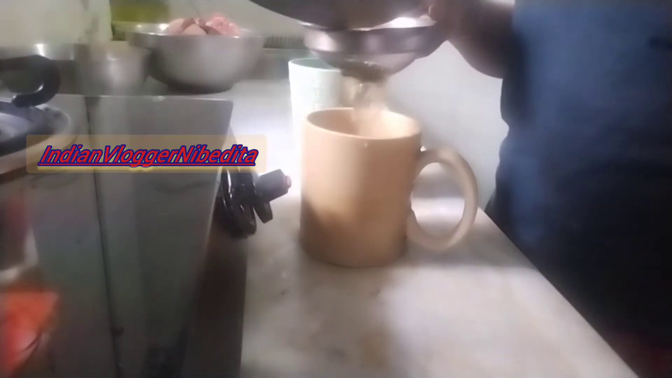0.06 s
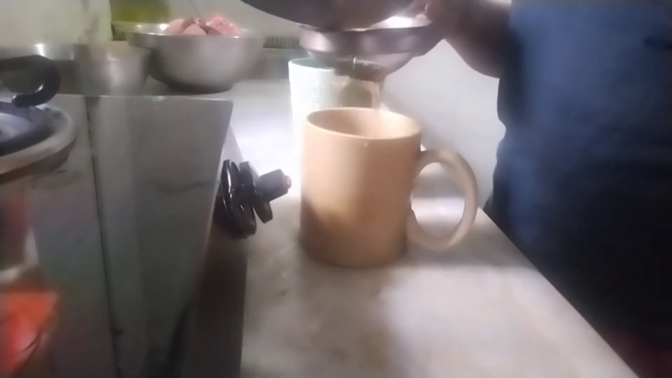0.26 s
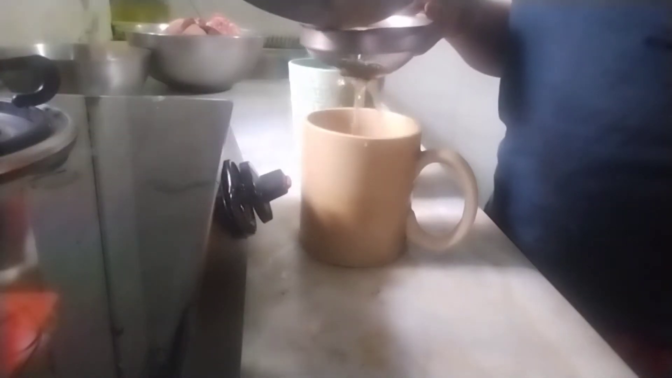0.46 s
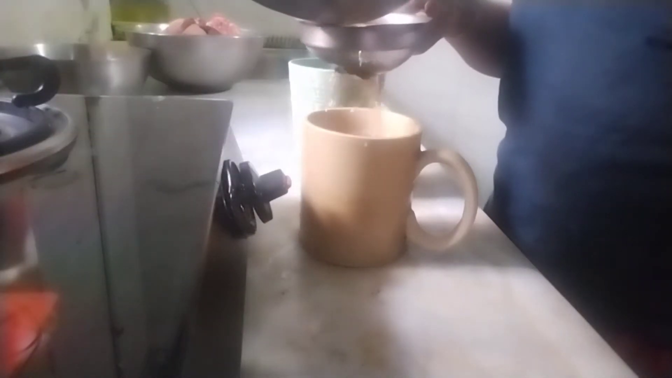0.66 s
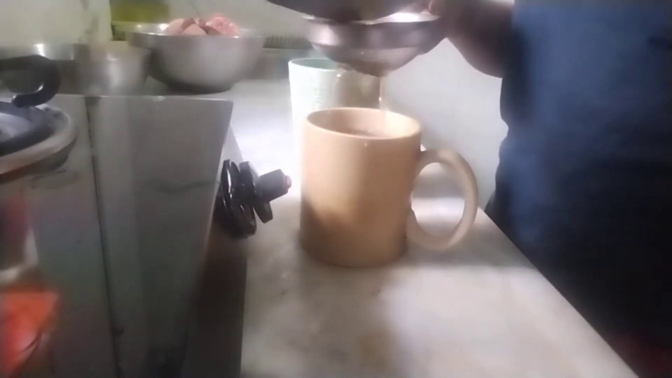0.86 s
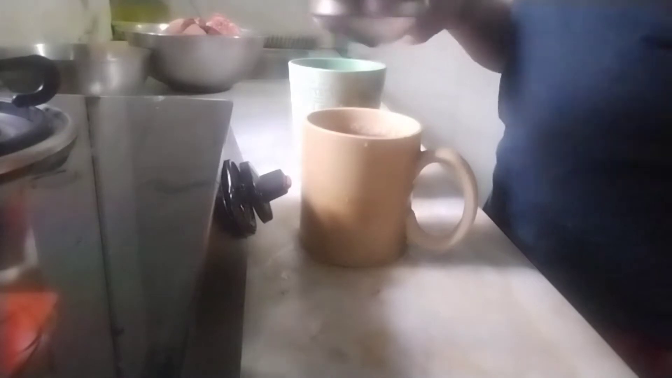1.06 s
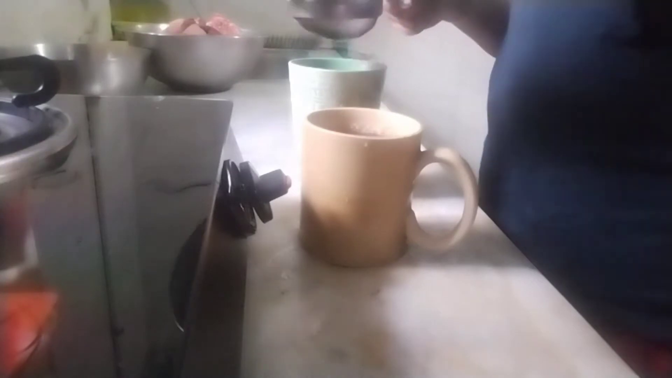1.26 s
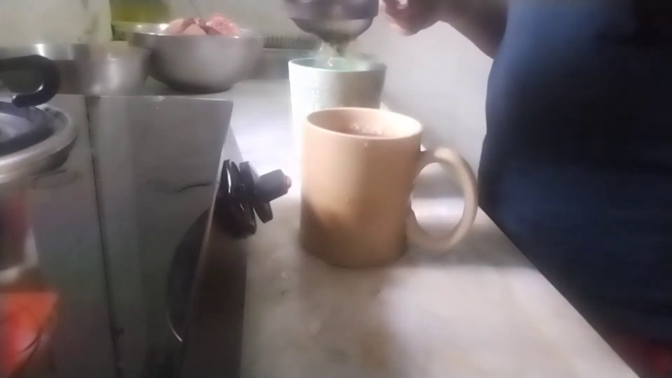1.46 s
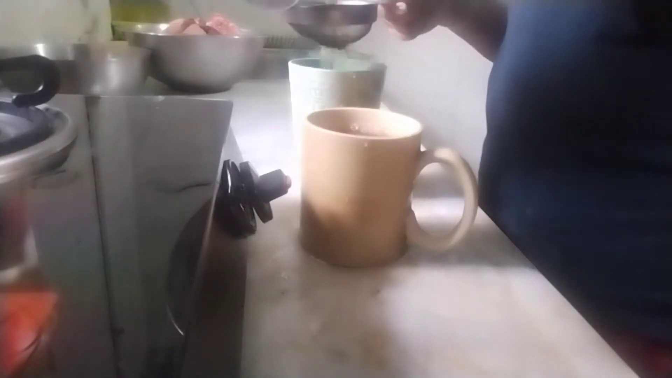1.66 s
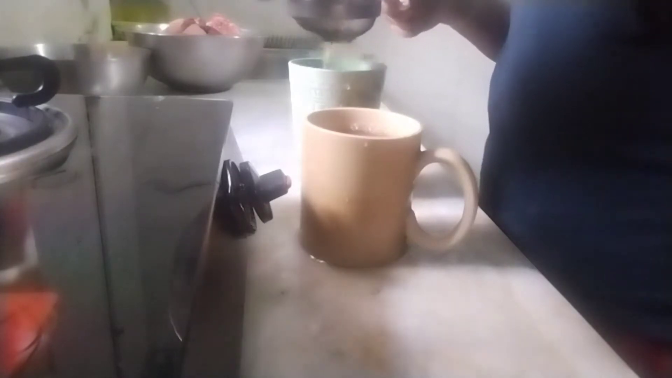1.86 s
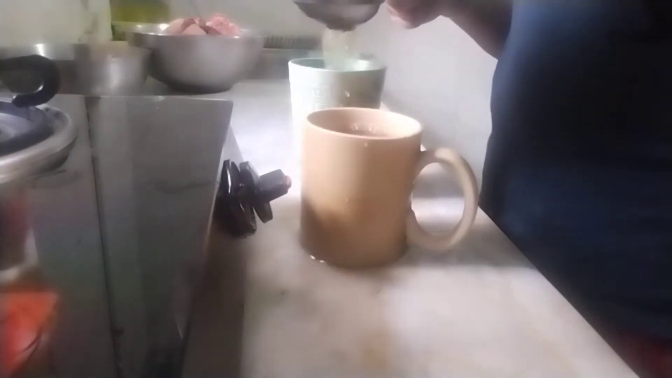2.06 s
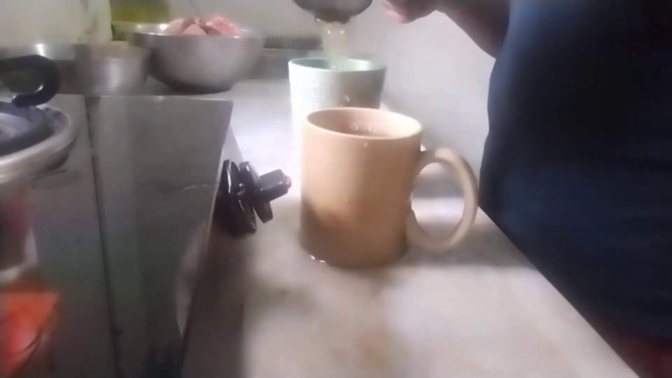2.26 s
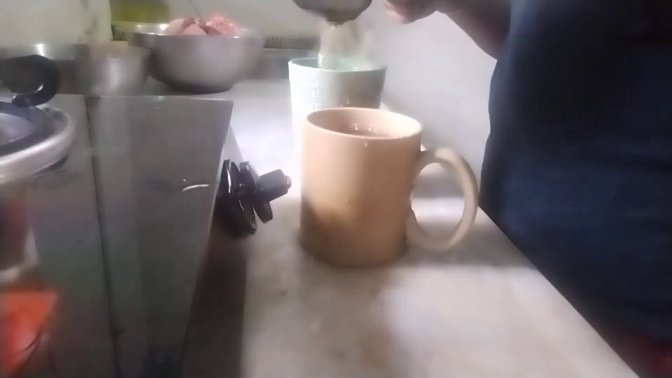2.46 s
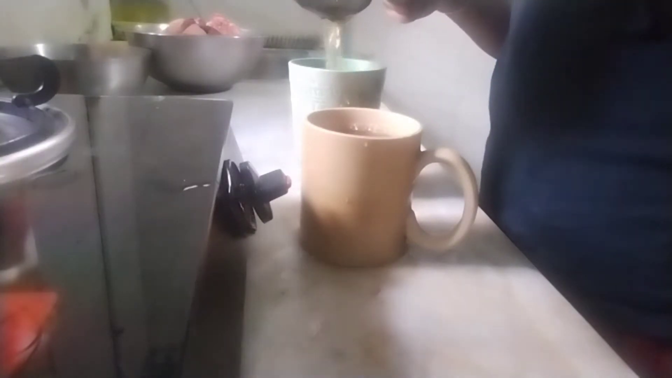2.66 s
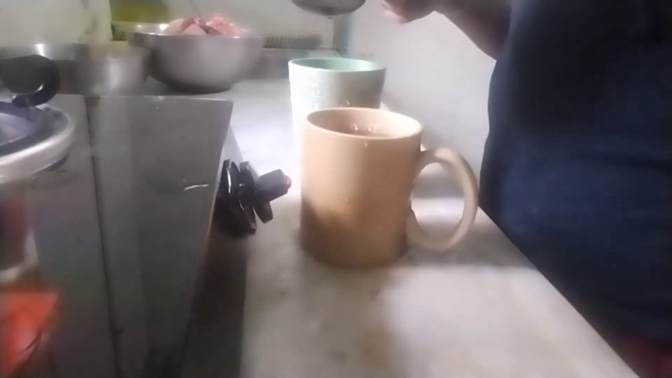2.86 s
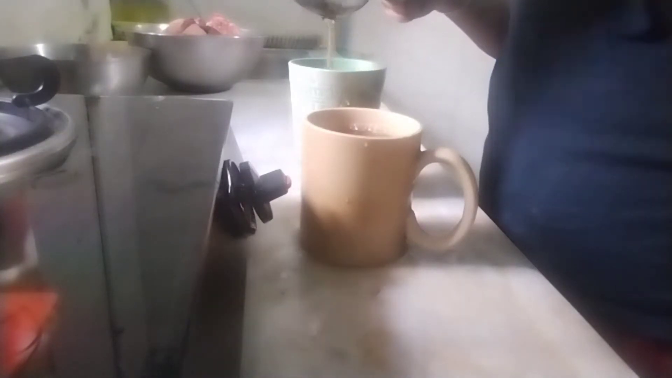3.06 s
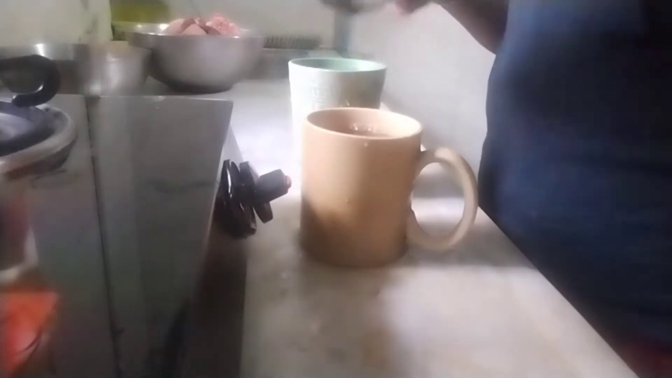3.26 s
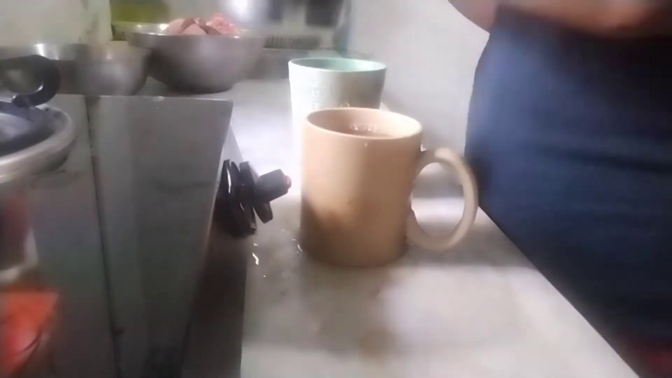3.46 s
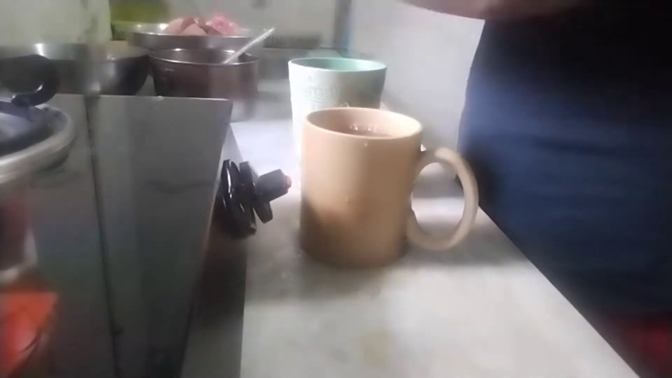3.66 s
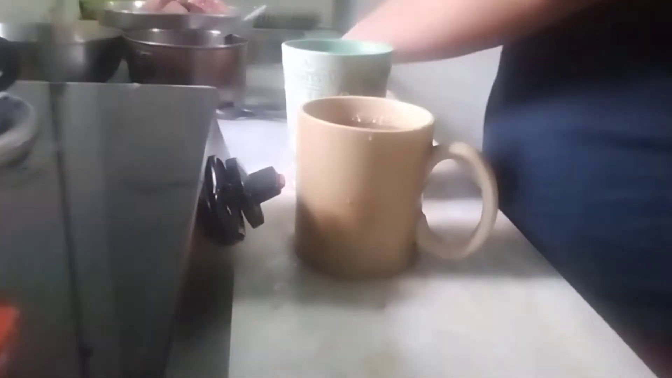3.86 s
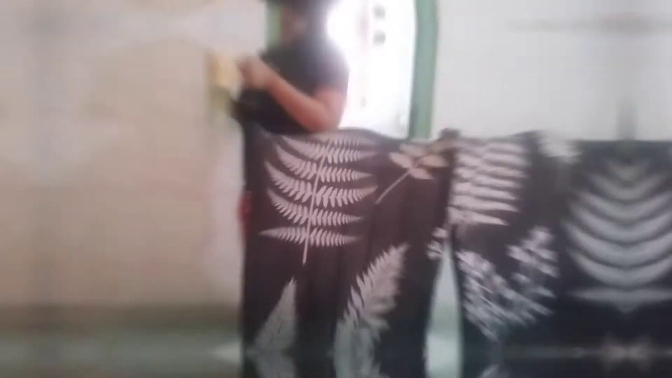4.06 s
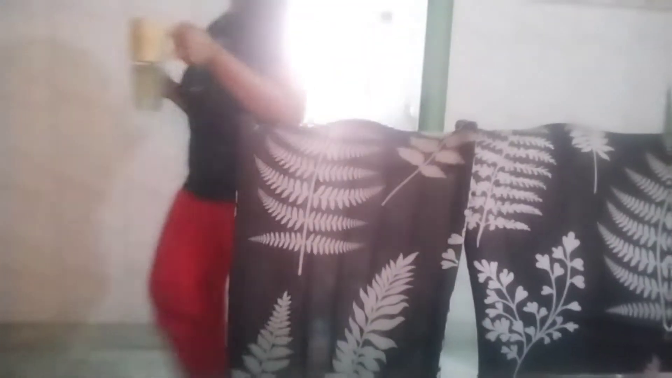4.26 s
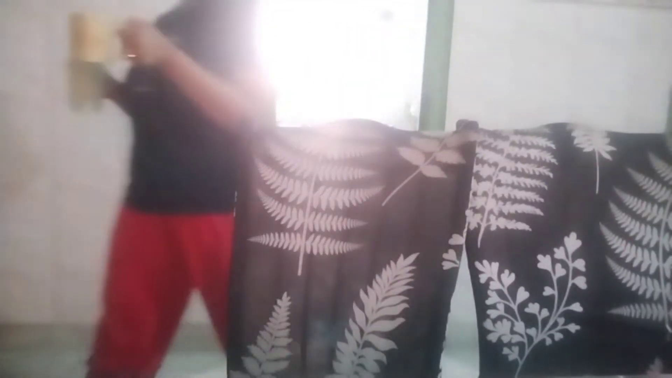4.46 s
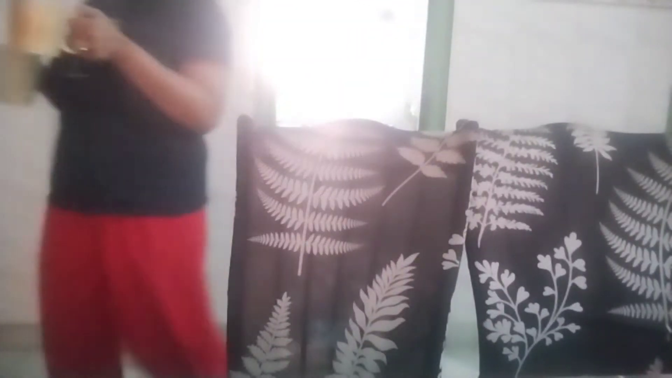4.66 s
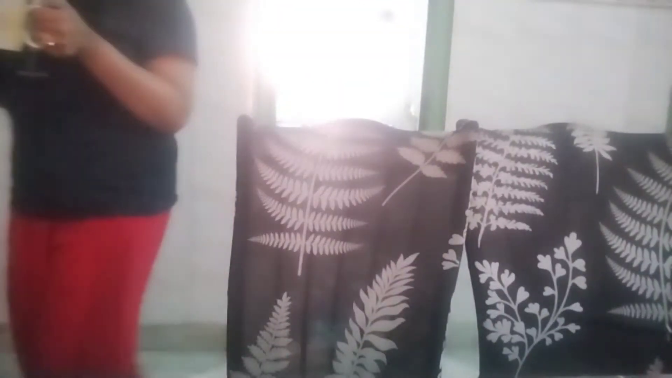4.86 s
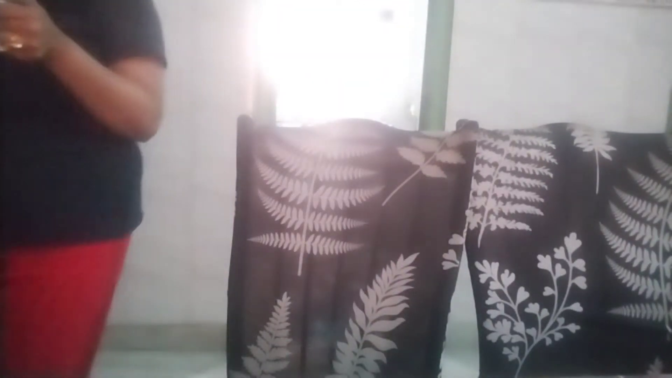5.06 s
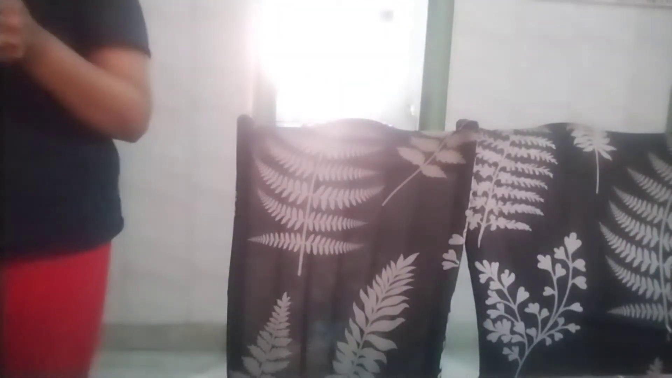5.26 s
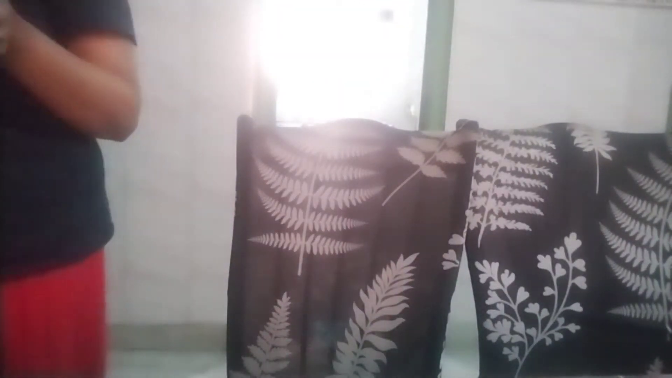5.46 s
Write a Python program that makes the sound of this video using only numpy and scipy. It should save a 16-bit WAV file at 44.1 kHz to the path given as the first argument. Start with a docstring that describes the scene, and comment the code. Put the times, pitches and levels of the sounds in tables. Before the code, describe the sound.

In a quiet kitchen, close to the microphone, tea trickles in quick surges into a mug, thins to drips, and a utensil lightly brushes ceramic. A second mug fills with hollow plops and spatter, slowing to drops. A metal pan lands with a heavy clunk, the strainer rattles after it, then the sound gives way to another room's soft hush with tiny squeaks.

```python
"""Tea strained into two mugs

Tea runs through a steel strainer into one ceramic mug, then a second, on a stone kitchen counter.
Crowds of small bubbles make gurgle and spatter, single bubbles the plops, narrow-band noise the ringing air.
The pan is set down with a rattle, the strainer dropped after it: decaying modes plus streaked noise.
The kitchen then fades away; the fuller hush of another room comes up, with a rustle and faint squeaks."""
import sys
import numpy as np
from scipy import signal
from scipy.fft import rfft, irfft
from scipy.io import wavfile
from scipy.ndimage import uniform_filter1d

SR = 44100
rng = np.random.default_rng(int(sys.argv[2]) if len(sys.argv) > 2 else 0)


def wav_out(sig):
    """Save sig, one row per channel (or a flat mono array), as 16-bit PCM at SR to the path in sys.argv[1]."""
    wavfile.write(sys.argv[1], SR, np.round(np.clip(np.atleast_2d(sig).T, -1, 1) * 32767).astype(np.int16))


N = 242991
TIME = np.arange(N) / SR  # s
TOP_HZ = 15850
# one pour per mug: start/s, ebb start/s, ebb rate/(dB/s), gurgle/dB, spatter/dB, surge depth/0-1
POURS = [(-0.73, 0.58, 50, -55.5, -63, 0.8), (1.368, 2.095, 20, -54, -56.5, 0.7)]
POUR_END_S, SURGE_S = 3.35, 0.15
HOLLOW_HZ = 965  # air column of the nearly empty second mug
STRAY_HIGH_HZ = 4200  # also caps the satellites of all drops


def undb(db):
    """Decibels to gain."""
    return 10 ** (np.asarray(db) / 20)


def unit(x):
    """Scale to rms 1."""
    return x / np.sqrt(np.mean(x ** 2) + 1e-18)


def curve(rows):
    """Interpolate (s, value) rows at every sample."""
    return np.interp(TIME, *np.transpose(rows))


def ramp(start_s, length_s):
    """A straight rise from 0 to 1."""
    return np.clip((TIME - start_s) / length_s, 0, 1)


def swell(centre_s, length_s):
    """One half-sine rise and fall."""
    return np.sin(np.pi * ramp(centre_s - length_s / 2, length_s))


def add(out, start_s, sound):
    """Mix a sound in at its start time, or at 0 if that is earlier."""
    i = max(int(start_s * SR), 0)
    out[i:i + len(sound)] += sound[:max(N - i, 0)]


def colour(x, spectrum):
    """Minimum-phase filter through (Hz, dB) points; the result has rms 1."""
    hz, db = np.transpose(spectrum)
    size = 4096
    grid = np.maximum(np.arange(size // 2 + 1) * SR / size, 1)
    log_gain = np.log(undb(np.interp(np.log(grid), np.log(hz), db)))
    # folding the cepstrum makes the filter causal
    cepstrum = irfft(log_gain)
    cepstrum[1:size // 2] *= 2
    cepstrum[size // 2 + 1:] = 0
    impulse = irfft(np.exp(rfft(cepstrum)))
    return unit(signal.fftconvolve(x, impulse)[:len(x)])


def walk(rate_per_s, size=N):
    """Random levels, each held 1 / rate, smoothed twice over that time; rms 1."""
    k = int(SR / rate_per_s)
    steps = np.repeat(rng.standard_normal(size // k + 1), k)
    return unit(uniform_filter1d(uniform_filter1d(steps, k), k)[:size])


def steady(x, span_s):
    """Even out the loudness over the span, keeping the finer grain."""
    k = int(span_s * SR)
    power = uniform_filter1d(uniform_filter1d(x ** 2, k), k)
    return x / np.sqrt(np.abs(power) + 1e-9)


def resonance(hz, width_hz, size=N):
    """A resonance kept ringing by random pushes; rms 1."""
    phase = 2 * np.pi * np.cumsum(hz * np.ones(size)) / SR
    return unit(walk(width_hz, size=size) * np.sin(phase) + walk(width_hz, size=size) * np.cos(phase))


def stream():
    """Surging pours and short spurts set how hard the tea gurgles and spatters."""
    # spurts that spatter: centre t/s, length/s, peak level/dB
    spurt_rows = [(0.25, 0.03, -55), (0.49, .08, -53), (0.645, .05, -60), (0.8, 0.08, -60),
                  (1.578, .05, -48), (1.71, 0.03, -52), (2.985, 0.04, -62)]
    pool_s, empty_gurgle_db = 0.6, -14.5  # the gurgle starts weak and gains strength over pool_s
    churn = np.zeros(N)
    splash = sum(undb(db) * swell(s, length) for s, length, db in spurt_rows)
    for start, ebb, ebb_rate, gurgle_db, spatter_db, depth in POURS:
        strength = flow(start, ebb, ebb_rate) * surges(start, depth)
        churn += strength * undb(gurgle_db + empty_gurgle_db * (1 - ramp(start, pool_s)))
        splash += strength * undb(spatter_db)
    return churn * gurgle() + splash * spatter(ticks_per_s=500, tick_db=-9, spread_db=4.0)


def flow(start_s, ebb_s, ebb_db_per_s):
    """Strength of one pour, 0-1: it builds up, holds, ebbs away and stops as the pan runs dry."""
    attack_s, dry_s = 0.22, 2.6
    ebb = undb(-ebb_db_per_s * np.maximum(TIME - ebb_s, 0))
    return ramp(start_s, attack_s) * ebb * (1 - ramp(dry_s, attack_s))


def surges(start_s, depth):
    """Tea leaves the pan in regular surges, 0-1, that rise faster than they fall."""
    phase = (TIME - start_s) / SURGE_S % 1
    skew = 0.7
    return 1 - min(depth, 1) * (1 - np.sin(np.pi * phase ** skew))


def running():
    """Summed strength of the pours, with their surges."""
    return sum(flow(start, ebb, ebb_rate) * surges(start, depth) for start, ebb, ebb_rate, _, _, depth in POURS)


def gurgle():
    """Bubbles churn where the stream enters the tea."""
    # colour of the churn: f/Hz, level/dB
    gurgle_spectrum = [(200, -27), (450, -13), (800, -5), (1200, 0), (1600, -1), (1950, -17), (2800, -26)]
    bubbles = crowd(hz=1100, per_s=950, scatter_octaves=1, cycles=3, spread_db=2.8, span_s=0.035)
    return colour(bubbles, gurgle_spectrum)


def spatter(ticks_per_s, tick_db, spread_db):
    """Tiny bubbles crackle in the splash; droplets tick against the mug wall."""
    crackle = crowd(hz=3600, per_s=1400, scatter_octaves=1.1, cycles=4.5, spread_db=2.8, span_s=0.035)
    hits = rng.random(N) < ticks_per_s / SR
    ticks = hits * undb(spread_db * rng.exponential(size=N)) * rng.choice([-1, 1], N)
    return in_mugs(crackle + undb(tick_db) * steady(ticks, 0.051))


def in_mugs(x):
    """Colour a splash by the mug in use; each half is taken from a filtered whole of rms 1."""
    # colour of the splash in each mug: f/Hz, level/dB
    first_spectrum = [(1200, -17), (1750, -4), (2300, -3), (3000, -2), (4000, 4.5), (4900, -12),
                      (6000, -9.5), (8200, -15.5), (9400, -32.5), (16000, -21)]
    second_spectrum = [(1200, -21.5), (2050, -12), (2700, -1), (3200, -7), (3800, 4), (4700, -8),
                       (5800, -8), (7000, -7), (8100, -7), (9400, -31), (16000, -33)]
    change_s = 1.2
    return np.where(TIME < change_s, colour(x, first_spectrum), colour(x, second_spectrum))


def crowd(hz, per_s, scatter_octaves, cycles, spread_db, span_s):
    """Many small bubbles of scattered size, a few much louder than the rest."""
    out = np.zeros(N)
    for when, size, life, pick in rng.random((int(per_s * POUR_END_S), 4)):
        pitch = min(hz * 2 ** (scatter_octaves * (2 * pick - 1)), SR / 3)
        gain = undb(-spread_db * np.log(1 - size))
        add(out, when * POUR_END_S, gain * bubble(pitch, cycles * (0.5 + life) / pitch, 0.01, 1))
    return steady(out, span_s)


def bubble(hz, peak_s, glide, roundness):
    """A trapped bubble swells to its peak, dies away and rises in pitch as it nears the surface."""
    t = np.arange(int(peak_s * (2 + 10 / roundness) * SR) + 2) / SR
    age = t / peak_s
    tone = np.sin(2 * np.pi * hz * t * (1 + glide * age / 2))
    return tone * (age * np.exp(1 - age)) ** roundness


def peak_time(hz):
    """Time in s in which a bubble of this pitch swells; smaller ones are quicker."""
    return 0.0031 * (1000 / hz) ** 0.55


def glugs(scatter_octaves, spread_db, glide, count):
    """Each glug is a quick run of bubbles of nearly one size."""
    # runs: centre t/s, length/s, f/Hz, rms over the length/dB
    glug_rows = [(0.04, .09, 1450, -53), (0.205, .07, 850, -53), (0.465, .06, 650, -52),
                 (0.515, .08, 2250, -56), (0.54, .045, 1250, -48), (0.67, .07, 820, -50),
                 (0.765, .06, 1050, -55), (0.828, .025, 2400, -54), (1.12, .04, 1150, -59),
                 (1.41, .025, 3200, -59), (1.465, .045, 3950, -55), (1.546, .022, 2900, -44),
                 (1.688, .018, 2800, -42), (1.728, .02, 1300, -41), (2.088, .03, 500, -45),
                 (2.105, .07, 1300, -49), (2.45, .05, 2050, -58), (2.45, .16, 390, -59),
                 (3.045, .055, 1500, -56), (3.14, .06, 1400, -60), (3.152, .04, 380, -53)]
    out = np.zeros(N)
    for s, length, hz, db in glug_rows:
        run = np.zeros(N)
        for k, (late, pick, size) in enumerate(rng.random((count, 3))):
            place = (k + late) / count  # 0-1 along the run
            pitch = hz * 2 ** (scatter_octaves * (2 * pick - 1))
            gain = undb(spread_db * size) * np.sqrt(np.sin(np.pi * place))
            start_s = s + length * (place - 0.5) - peak_time(hz)
            add(run, start_s, gain * bubble(pitch, peak_time(pitch), glide, 2))
        out += undb(db) * run * np.sqrt(length * SR / np.sum(run ** 2))
    return out


def drops(glide, roundness, tick_db, tick_s, satellite_db, scatter_octaves, count):
    """Each drop ticks on the surface and leaves a short bubble note with smaller satellites."""
    # loudest drops, each trapping a bubble: t/s, f/Hz, peak level/dB
    drop_rows = [(0.032, 3720, -32), (0.037, 684, -37), (0.087, 688, -36.5), (0.116, 650, -36),
                 (0.298, 3260, -32), (0.336, 1576, -32.5), (0.381, 1460, -41), (0.566, 770, -34),
                 (0.775, 4250, -43), (1.246, 300, -46), (1.656, 656, -31), (1.677, 2810, -31),
                 (1.697, 663, -36), (1.838, 642, -34), (1.860, 562, -35), (1.919, 705, -37),
                 (1.948, 3810, -30), (1.965, 2850, -42), (1.987, 617, -36), (2.002, 3750, -34),
                 (2.024, 3690, -33), (2.031, 1250, -38), (2.069, 474, -37), (2.152, 3700, -38),
                 (2.194, 3660, -45), (2.261, 3840, -35), (2.310, 2190, -43), (2.355, 3980, -45),
                 (2.384, 2030, -47), (2.978, 729, -49), (3.175, 3850, -40)]
    out, splash = np.zeros(N), np.zeros(N)
    for s, hz, db in drop_rows + stray_drops():
        add(out, s, undb(db) * bubble(hz, peak_time(hz), glide, roundness))
        # small, fast drops tick harder than big, soft ones
        add(splash, s, undb(db + tick_db) * hz / 3500 * np.exp(-TIME[:1024] / tick_s))
        for late, size in rng.random((count, 2)):
            pitch = min(hz * 2 ** (scatter_octaves * size), STRAY_HIGH_HZ)
            satellite = bubble(pitch, peak_time(pitch) / 2, glide, 1)
            add(out, s + late * peak_time(hz), undb(db + satellite_db) * satellite)
    smack_ring, smack_spray = smacks()
    return out + smack_ring + (splash + smack_spray) * in_mugs(rng.standard_normal(N))


def stray_drops():
    """Lesser drops fall at random, weaker as the flow ebbs: rows of (s, pitch Hz, peak dB)."""
    per_s, full_flow_db, low_hz = 14, -49, 500
    db = full_flow_db + 20 * np.log10(running() + 1e-9)
    rows = []
    for when, pick in rng.random((int(per_s * POUR_END_S), 2)):
        s = when * POUR_END_S
        rows.append((s, low_hz * (STRAY_HIGH_HZ / low_hz) ** pick, db[int(s * SR)]))
    return rows


def smacks():
    """Drops smack on the mug wall and burst: a ringing noise band, and the envelope of their spray."""
    # smacks: t/s, centre f/Hz, level/dB
    smack_rows = [(0.033, 3700, -43), (0.289, 1950, -43), (0.337, 3300, -42), (1.565, 3900, -40),
                  (1.755, 4000, -43.5), (1.799, 4100, -45), (1.870, 3500, -33), (1.872, 2600, -38),
                  (2.263, 3900, -45), (2.330, 3900, -48), (2.502, 3300, -52), (2.966, 2300, -51)]
    width_hz, spray_db, peak_s = 1000, -9, 0.0013
    ring, spray_level = np.zeros(N), np.zeros(N)
    age = TIME[:4096] / peak_s
    for s, hz, db in smack_rows:
        burst = undb(db) * np.sqrt(age * np.exp(1 - age))
        add(ring, s, burst * steady(resonance(hz, width_hz, size=len(burst)), 0.004))
        add(spray_level, s, burst * undb(spray_db))
    return ring, spray_level


def hollow(width_hz, broken_db):
    """The stream rings the air column of the second mug; as the mug fills the note rises and breaks up."""
    covered_s, rise_hz_per_s = 1.76, 680  # the bottom is covered from here on
    open_db, damped_db, damp_s = -43, -12, 0.038
    start, ebb, ebb_rate, _, _, depth = POURS[1]
    covered = ramp(covered_s - damp_s, damp_s)
    hz = HOLLOW_HZ + rise_hz_per_s * np.maximum(TIME - covered_s, 0)
    db = open_db + covered * (damped_db + broken_db * walk(49.93))
    # only the full stream, from the second surge on, drives it with force
    drive = flow(start + SURGE_S, ebb, ebb_rate) ** 0.68 * flow(start, ebb, ebb_rate) ** 3
    drive = drive * surges(start, depth) ** covered
    return drive * undb(db) * steady(resonance(hz, width_hz), 0.041)


def knocks():
    """Single drops ring the air in the nearly empty second mug."""
    # drops on the bottom: t/s, peak level/dB
    knock_rows = [(1.491, -40), (1.585, -39), (1.656, -32), (1.695, -33), (1.750, -42), (1.777, -39.5),
                  (1.798, -45)]
    out = np.zeros(N)
    for s, db in knock_rows:
        add(out, s, undb(db) * bubble(HOLLOW_HZ, peak_s=0.004, glide=0, roundness=1))
    return out


def spray():
    """Fine spray hisses off the mesh in uneven puffs while tea runs, with a few stronger ones."""
    # colour: f/Hz, level/dB
    spray_spectrum = [(1500, -13), (4000, -2), (8000, 0.5), (9400, -17), (16000, -12)]
    # stronger puffs: centre t/s, length/s, peak level/dB
    puff_rows = [(0.247, 0.027, -55), (1.925, .03, -59), (2.045, 0.06, -55.5)]
    level_db, flicker_db, puffs_per_s = -71.5, 4.5, 47
    hiss = np.sqrt(running()) * undb(level_db + flicker_db * walk(puffs_per_s))
    puffs = sum(undb(db) * swell(s, length) for s, length, db in puff_rows)
    return (hiss + puffs) * colour(rng.standard_normal(N), spray_spectrum)


def utensils():
    """The strainer brushes a mug, the pan is set down and skids, the strainer rattles to rest."""
    # contacts: what rings, peak t/s, rise/s, rattle/dB, ring/dB, favoured f/Hz, favour/dB, pitch ratio
    contact_rows = [("mug", 0.990, .022, -44, -42.5, 5100, 1.9, 1),
                    ("pan rim", 2.702, .014, -55, -47.5, 700, 3, .93),
                    ("strainer", 3.340, .007, -46, -58.5, 650, 16, 1),
                    ("pan rim", 3.354, .018, -51.5, -46, 930, 21, 1.02),
                    ("pan rim", 3.403, .02, -41, -34.5, 6000, 8, 0.98),
                    ("pan rim", 3.453, .019, -34, -29.5, 1000, 7, 1.005),
                    ("pan rim", 3.483, .012, -49, -48, 3700, 10, 1),
                    ("pan base", 3.547, .023, -14.7, -17.3, 520, 5, 1),
                    ("pan base", 3.586, .016, -26, -33, 950, 8, 1),
                    ("pan rim", 3.594, .034, -30.5, -45, 5600, 4, 1),
                    ("pan rim", 3.614, .012, -27, -40, 3900, 5, .99),
                    ("pan base", 3.616, .018, -28, -37, 1000, 15, 1),
                    ("strainer", 3.659, 0.014, -52, -47, 3600, 4, 1),
                    ("strainer", 3.799, .019, -33.5, -41, 7200, 3, 1),
                    ("strainer", 3.820, .008, -44, -52, 380, 10, 0.96),
                    ("strainer", 3.845, .003, -37, -54.5, 800, 8, 0.98),
                    ("strainer", 3.873, .026, -34, -33, 3570, 8, 1),
                    ("strainer", 3.888, .012, -47, -35, 7500, 11, 1),
                    ("strainer", 3.894, .012, -35, -52, 750, 8, 1),
                    ("strainer", 3.921, .008, -60, -47, 7200, 14, 1)]
    out = np.zeros(N)
    for what, s, rise, *levels in contact_rows:
        add(out, s - rise, contact(what, rise, *levels))
    return out


def contact(what, rise_s, rattle_db, ring_db, favoured_hz, favour_db, pitch, waver=0.008, shake_db=3.2):
    """Each contact swells in softly and dies away: coloured noise over decaying modes."""
    # modes of each thing: f/Hz, level/dB, t60/s
    modes_of = { "mug": [(495, -11, 0.25), (1497, -2, 0.053), (2105, -12, 0.091), (2568, -8, 0.068),
                (2853, -2, 0.06), (3068, -14, 0.076), (4118, -9, 0.063), (4651, 0, 0.071),
                (5459, -10, 0.053)], "pan rim": [(694, 2.5, 0.022), (762, -14, 0.05), (1000, -21, 0.1),
                (1660, -16, 0.074), (1850, -13, 0.06), (2760, -13, .04), (3000, -17, 0.08),
                (3660, -14, 0.06), (5990, -13, .05)], "pan base": [(681.4, 2, 0.06), (758, -3, .075),
                (866, -9, 0.082), (980, -9, 0.1), (1293, -11, 0.09), (1450, -14, 0.073), (1665, 0, 0.09),
                (1730, -9.5, 0.072), (1825, -12, .07), (1968, -7, 0.06), (2096, -15, 0.1),
                (2612, -3.5, 0.08), (2810, -9, .07), (3478, -8, 0.07), (3580, -11, .09), (4368, -17, .06),
                (5950, -20, .07)], "strainer": [(376, -9, .056), (3572, 0, 0.045), (3670, -8, 0.035),
                (3822, -7, 0.031), (6470, 0, 0.08), (7220, -2.5, .085), (7350, -9, .05), (10700, -10, 0.07),
                (10950, -14, .06), (13700, -14, .045), (14707, -7, .045)]}
    # time constant of the noise decay of each thing/s
    decay_s = {"mug": .0075, "pan rim": .009, "pan base": 0.0105, "strainer": 0.011}
    # colour of each rattle: f/Hz, level/dB
    mug_spectrum = [(200, -42), (1500, -9), (2800, 3), (4700, 4), (8300, -13.5), (16000, -26)]
    rim_spectrum = [(70, -50), (200, -21), (400, -8), (600, -17), (1350, -8.5), (1800, -4), (2800, -4),
                    (3650, -4), (4700, -8), (5970, -6), (8080, -12.5), (9500, -27.5), (16000, -32)]
    base_spectrum = [(70, -62), (150, -42), (210, -25), (400, -33.5), (680, -5), (1100, -14), (1750, -13),
                     (2200, -19), (2700, -14), (4400, -20.5), (7500, -27), (9400, -44), (16000, -49)]
    strainer_spectrum = [(88, -50), (190, -12), (380, -6), (1100, -6.5), (1800, -14), (2700, -8),
                         (3700, -7.5), (7600, -7.5), (9260, -28), (12200, -17), (16000, -21)]
    rattle_of = {"mug": mug_spectrum, "pan rim": rim_spectrum, "pan base": base_spectrum,
                 "strainer": strainer_spectrum}
    t = TIME[:SR // 4]
    decay = np.exp(-np.maximum(t - rise_s, 0) / decay_s[what])
    envelope = np.where(t < rise_s, (t / rise_s) ** 1.3, decay)

    def favour(hz):
        """Boost in dB near the favoured frequency."""
        width_octaves = 0.2
        return favour_db * np.exp(-0.5 * (np.log2(hz / favoured_hz) / width_octaves) ** 2)

    ring, power = 0, 0
    for hz, db, t60 in modes_of[what]:
        # squared envelope, prolonged by the mode's own decay
        mode_power = signal.lfilter([1], [1, -np.exp(-2 * np.log(1000) / (t60 * SR))], envelope ** 2)
        # pitch wavers, less in the high modes; the level of all shakes
        drift = waver * min(1000 / hz, 1) * walk(120, size=len(t))
        phase = 2 * np.pi * (np.cumsum(hz * pitch * (1 + drift)) / SR + rng.random())
        gain = undb(db + favour(hz))
        shake = undb(shake_db * walk(110, size=len(t)))
        ring = ring + gain * shake * np.sqrt(2 * mode_power / mode_power.max()) * np.sin(phase)
        power += gain ** 2
    points_hz, points_db = np.transpose(rattle_of[what])
    grid = np.geomspace(50, TOP_HZ, 200)
    grid_db = np.interp(np.log(grid), np.log(points_hz), points_db) + favour(grid)
    noise = envelope * rattle(np.transpose([grid, grid_db]), size=len(t))
    return undb(rattle_db) * noise + undb(ring_db) * ring / np.sqrt(power)


def rattle(spectrum, size, grain_db=3, streak_t60=0.037):
    """Coloured, grainy noise; convolution with a second, decaying noise streaks its treble."""
    streaks = rng.standard_normal(size) * np.exp(-np.log(1000) * TIME[:size] / streak_t60)
    streaked = unit(irfft(rfft(rng.standard_normal(size)) * rfft(streaks), size))
    low = signal.butter(2, 1200, "low", fs=SR, output="sos")
    high = signal.butter(2, 1200, "high", fs=SR, output="sos")
    noise = signal.sosfilt(low, rng.standard_normal(size)) + signal.sosfilt(high, streaked)
    grain = undb(grain_db * walk(500, size=size))
    return steady(colour(noise * grain, spectrum), 0.016)


def room(x, wet_db, t60, top_hz):
    """The counter and tiled walls add a short, duller tail."""
    t = TIME[:SR // 2]
    tail = rng.standard_normal(len(t)) * np.exp(-np.log(1000) * t / t60) * (t > 0.003)
    tail = signal.sosfilt(signal.butter(1, min(top_hz, SR / 3), fs=SR, output="sos"), tail)
    return x + undb(wet_db) * signal.fftconvolve(x, tail / np.sqrt(np.sum(tail ** 2)))[:N]


def room_tone(spectrum, db, flicker_db):
    """A soft hush of coloured noise that wavers slightly."""
    return undb(db + flicker_db * walk(14)) * colour(rng.standard_normal(N), spectrum)


def kitchen_tone():
    """The kitchen's hush, with a faint boom of the small room."""
    # colour: f/Hz, level/dB
    kitchen_spectrum = [(25, -22), (90, -4), (300, 0), (480, -5), (1000, -6), (1900, -19), (3500, -13.5),
                        (8000, -19.5), (9400, -35), (16000, -39)]
    # course: t/s, level/dB
    kitchen_level = [(0, -62.5), (1.4, -63.5), (2.2, -60), (2.85, -64.5), (3.5, -60.5), (3.75, -70.5)]
    boom = undb(-73) * resonance(hz=208.0, width_hz=36)
    return boom + room_tone(kitchen_spectrum, curve(kitchen_level), flicker_db=0.97)


def other_room():
    """A fuller hush fades in, with a soft rustle and a few thin, faint squeaks."""
    # colour of the hush: f/Hz, level/dB
    hall_spectrum = [(25, -45), (92, -19), (134, -7.5), (290, 0), (575, -14), (754, -9), (1100, -11),
                     (2080, -26), (2550, -22), (2990, -25.5), (3820, -23), (4870, -32), (7110, -34),
                     (16000, -78)]
    # colour of the rustle: f/Hz, level/dB
    rustle_spectrum = [(800, -11), (1900, -3), (2700, -6.5), (4000, -2), (5200, -17), (10000, -40)]
    # course of the rustle: t/s, level/dB
    rustle_level = [(4.8, -92), (5.26, -65), (5.35, -70), (5.51, -70)]
    # squeaks: centre t/s, length/s, f/Hz, level/dB
    squeak_rows = [(4.62, .14, 2580, -73), (5.06, .2, 3830, -69), (5.06, .14, 3450, -75),
                   (5.27, 0.14, 1830, -71)]
    fade_in_s, rise_s = 4.035, 0.46
    hush = ramp(fade_in_s, rise_s) * room_tone(hall_spectrum, db=-57, flicker_db=0.6)
    rustle = undb(curve(rustle_level) + 2 * walk(30)) * colour(rng.standard_normal(N), rustle_spectrum)
    squeaks = sum(undb(db) * swell(s, length) * resonance(hz, width_hz=130)
                  for s, length, hz, db in squeak_rows)
    return hush + rustle + squeaks


def scene():
    """The pour and the utensils in the kitchen, which fades out, then the other room."""
    plops = drops(glide=0.025, roundness=1.8, tick_db=-23, tick_s=0.0025, satellite_db=-12,
                  scatter_octaves=0.9, count=2)
    runs = glugs(scatter_octaves=0.33, spread_db=6, glide=0.004, count=14)
    tea = stream() + runs + spray() + hollow(width_hz=150, broken_db=4.0) + knocks() + plops
    kitchen = room(tea, wet_db=-12.5, t60=0.1, top_hz=6100)
    kitchen = kitchen + room(utensils(), wet_db=-28.0, t60=0.2, top_hz=4000) + kitchen_tone()
    fade_out_s, fade_db_per_s = 3.91, 215.5
    fade = undb(-fade_db_per_s * np.maximum(TIME - fade_out_s, 0))
    return (fade * kitchen + other_room())[None]


def record(dry):
    """A steep low-pass removes the top of the treble."""
    return signal.sosfilt(signal.ellip(10, 0.2, 80, TOP_HZ, fs=SR, output="sos"), dry)


dry = scene()
out = record(dry)
wav_out(out)
```